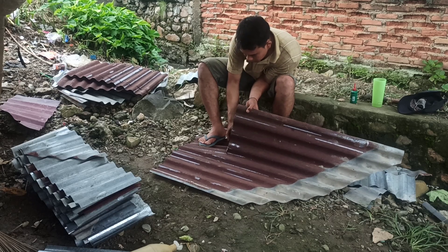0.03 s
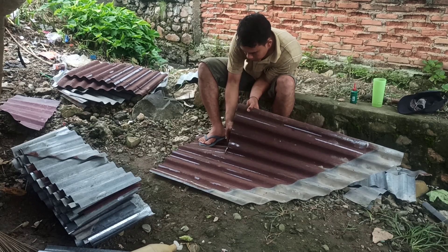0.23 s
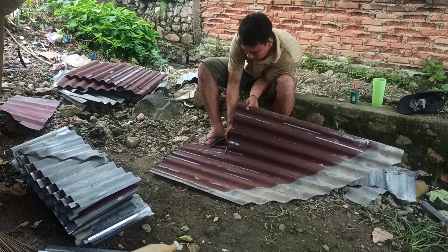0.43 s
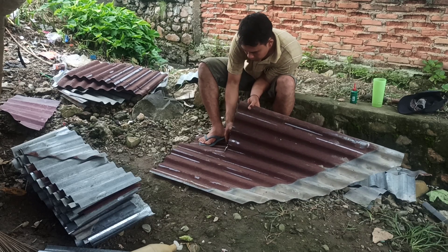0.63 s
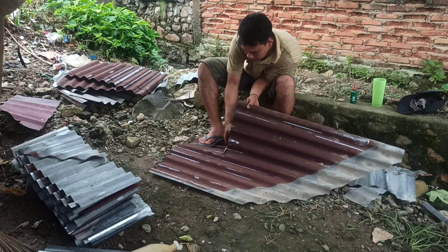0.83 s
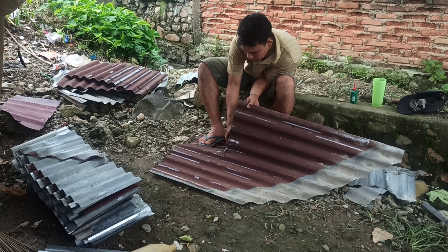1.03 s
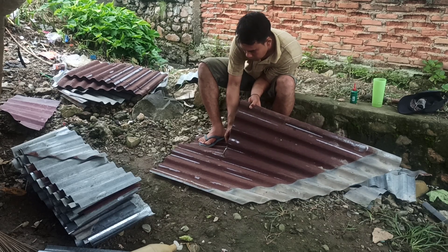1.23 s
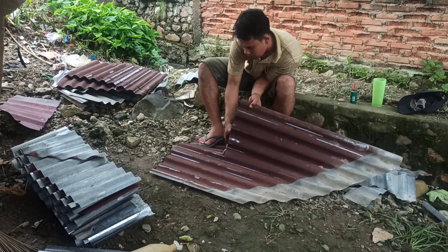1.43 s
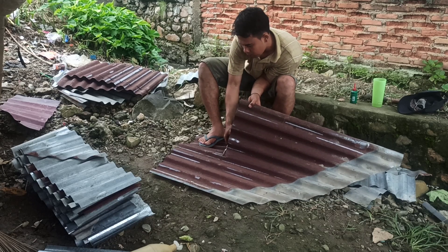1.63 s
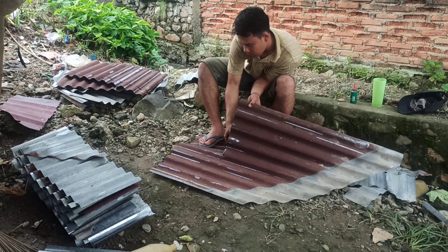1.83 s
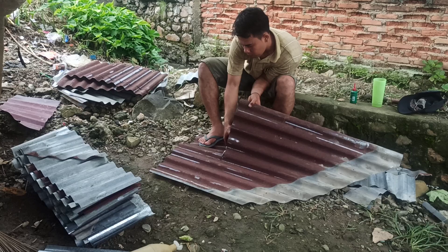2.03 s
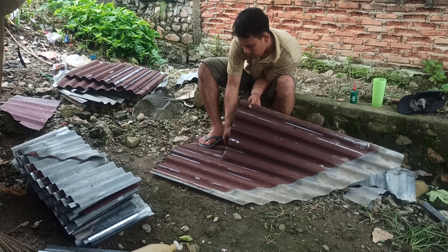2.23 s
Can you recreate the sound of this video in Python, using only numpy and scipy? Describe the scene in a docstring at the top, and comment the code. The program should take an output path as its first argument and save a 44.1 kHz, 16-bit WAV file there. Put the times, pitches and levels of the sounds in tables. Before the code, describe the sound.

Snipping through a thin corrugated metal sheet, with uneven tearing rasps, rattling knocks and brief squeals

```python
"""Tearing, clattering metal with sharp knocks, groans and short squeals, over quiet outdoor air.
Hand shears bite through a corrugated roofing sheet in a yard: each stroke is a run of slips and grit
that drives the sheet's dense and clear modes; buckling knocks drive the same modes as impulses.
Groans of the bent sheet and squeals of the blades are narrow noise resonances with gliding pitch.
Shaped noise makes the air, and a narrow resonance its thin high whine."""
import sys
import numpy as np
from scipy import signal
from scipy.fft import rfft, irfft
from scipy.io import wavfile

SR = 44100
rng = np.random.default_rng(int(sys.argv[2]) if len(sys.argv) > 2 else 0)


def inscribe(sig):
    """Save sig as 16-bit PCM at rate SR to the path in sys.argv[1].

    A 1-D sig is mono; a 2-D sig holds one channel per row.
    Samples are clipped to [-1, 1] before scaling.
    """
    pcm = np.round(np.clip(np.atleast_2d(sig).T, -1, 1) * 32767)
    wavfile.write(sys.argv[1], SR, pcm.astype(np.int16))


N = 101297

# stereo likeness over frequency: (frequency [Hz], left-right correlation [-1..1])
LIKENESS = [(100, .98), (250, 0.99), (500, 0.74), (1000, 0.28), (2500, 0.11), (5000, .05), (14000, 0.046)]


def amp(db):
    """Decibels to gain."""
    return 10 ** (np.asarray(db) / 20)


def evened(x):
    """Scales to rms 1."""
    return x / np.sqrt(np.mean(x ** 2) + 1e-20)


def read(points, hz):
    """Interpolates a table on a log-frequency axis."""
    f, value = np.transpose(points)
    return np.interp(np.log(hz + 1), np.log(f + 1), value)


def add(mix, start_s, sound):
    """Mixes a sound in at start_s, cut at the end of the mix."""
    part = mix[..., max(round(start_s * SR), 0):][..., :sound.shape[-1]]
    part += sound[..., :part.shape[-1]]


def colour(points, size=2048):
    """Causal minimum-phase impulse response with the given spectrum, via the Hilbert transform."""
    hz = abs(np.fft.fftfreq(size, 1 / SR))
    log_gain = np.log(amp(read(points, hz)))
    spectrum = np.exp(np.conj(signal.hilbert(log_gain)))
    return np.fft.ifft(spectrum).real[:size // 2]


def band_colour(band_db):
    """Impulse response from four band levels: bass, body, rasp and treble."""
    # band centres: (frequency [Hz])
    band_hz = [200, 580, 2500, 7000]
    return colour(list(zip(band_hz, band_db)))


def stereo(pair):
    """Mixes two unrelated signals as mid and side: alike in the bass, wide in the treble."""
    # channel balance: (frequency [Hz], left minus right [dB])
    balance = [(200, 0.3), (400, 3), (650, -1.2), (1200, 1), (2400, 0), (4400, 0.2), (7500, 2.5),
               (13000, -1.5)]
    a, b = rfft(pair)
    hz = np.fft.rfftfreq(pair.shape[1], 1 / SR)
    same = read(LIKENESS, hz)
    lean_db = read(balance, hz) / 2
    mid = a * np.sqrt((1 + same) / 2)
    side = b * np.sqrt((1 - same) / 2)
    return irfft([(mid + side) * amp(lean_db), (mid - side) * amp(-lean_db)], pair.shape[1])


def slips(length_s, rise_s, band_db):
    """One stroke: uneven slips and fine grit as the blades tear through the metal."""
    slips_per_s, slip_spread_db = 420, 4
    grit_db = -3  # relative to the slips
    release_s = 0.0047  # time constant
    t = np.arange(SR // 8) / SR
    chance = rng.random(len(t))
    size = rng.standard_normal(len(t))
    grit = rng.standard_normal(len(t))
    slip_gain = amp(slip_spread_db * np.clip(size, -2, 2))
    clicks = (chance < slips_per_s / SR) * slip_gain * np.sign(grit)
    force = np.minimum(t / rise_s, 1) * np.exp(-np.maximum(t - length_s, 0) / release_s)
    run = force * (evened(clicks) + amp(grit_db) * grit)
    run *= np.sqrt(length_s * SR) / np.linalg.norm(run)  # energy grows with length
    return signal.fftconvolve(run, band_colour(band_db))


def dense_ring():
    """Response of one spot on the sheet: a tick, a quick clatter and a wash of dense modes."""
    # decay of the dense modes: (frequency [Hz], t60 [s])
    decay = [(120, 0.19), (350, 0.71), (840, 0.42), (2200, 0.27), (6000, 0.24), (14000, 0.23)]
    # spectrum of the dense modes: (frequency [Hz], relative level [dB])
    sheet_spectrum = [(30, -39), (60, -26), (95, -31), (150, -7), (310, -7.5), (430, -0.5), (680, -1.5),
                      (1100, -9.5), (2400, -12.5), (4400, -17), (5400, -24), (7000, -15), (8300, -25.5),
                      (12000, -31), (16000, -31.5)]
    ring_db = -23
    tick_db, clatter_db, clatter_s = -14, -2.5, 0.0025  # levels relative to the wash; time constant
    noise = rng.choice([-1., 1.], (2, SR // 2))
    hz, t, z = signal.stft(noise, SR, nperseg=256)
    wash = amp(-60 * t / read(decay, hz)[:, None])
    clatter = np.exp(-t / clatter_s)
    wash_power = wash ** 2 / (wash ** 2).sum(1, keepdims=True)
    clatter_power = amp(clatter_db) ** 2 * clatter ** 2 / (clatter ** 2).sum()
    ring = signal.istft(z * np.sqrt(wash_power + clatter_power), SR, nperseg=256)[1]
    ring = stereo(ring / np.linalg.norm(ring[0]))
    ring[:, 0] += amp(tick_db)
    ring = signal.fftconvolve(ring, colour(sheet_spectrum)[None], axes=1)
    return amp(ring_db) * ring / np.sqrt((ring ** 2).sum() / 2)


def mode_ring():
    """The sheet's clear modes: decaying sines, each starting a little later in one channel."""
    # ringing modes: (frequency [Hz])
    mode_hz = [162, 196, 257, 424, 490, 587, 626, 672, 808, 985, 1135, 1348, 1715, 1873]
    # their levels: (level [dB])
    mode_db = [-42.5, -47, -39, -34.5, -37.5, -54, -43.5, -38, -38.5, -42.5, -43.5, -44, -50.5, -57]
    t60_s = 0.38
    t = np.arange(SR * 3 // 4) / SR
    out = 0
    for hz, db in zip(mode_hz, mode_db):
        lag_rad = np.arccos(read(LIKENESS, hz)) * rng.permutation(2)[:, None]
        swing = np.sin(np.maximum(2 * np.pi * hz * t - lag_rad, 0))
        ring = rng.choice([-1, 1]) * amp(-60 * t / t60_s) * swing
        highpass = signal.butter(2, hz / 2, "high", fs=SR, output="sos")
        ring = signal.sosfilt(highpass, ring)
        out = out + amp(db) * ring / np.linalg.norm(ring[0])
    return out


def sheet(count=14):
    """Strokes and buckling knocks drive the sheet's modes at changing spots along the cut."""
    # strokes of the shears and shifts of the sheet: (start [s], length [s], rise [s],
    # bass [dB], body [dB], rasp [dB], treble [dB])
    strokes = [ (0.000, 0.017, .002, 0, 5, -7, -6.5), (0.038, 0.028, .008, -3.5, 6, -11.5, -13),
               (0.090, 0.019, .006, 4.5, -5.5, -1.5, 0.5), (0.175, 0.047, .025, 2.5, 2, -12.5, -14),
               (0.261, 0.02, .005, -25, -12, -14, -7), (0.304, 0.026, 0.0054, -15, -10.5, -17.5, -13),
               (0.401, 0.026, .002, 7.5, -3, 3.5, -9), (0.441, 0.025, .010, -14, 6.5, 1, 8.5),
               (0.458, 0.032, .002, 2.5, 5.5, 3.5, -5), (0.615, 0.06, .040, -11.5, -2, -6.5, -5),
               (0.660, 0.033, .010, -5.5, -1, 6.5, 6.5), (0.745, 0.077, .020, 1.5, -16.5, -20, -20.5),
               (0.859, 0.019, .005, -1, -11, -11.5, -15.5), (0.915, 0.033, .010, -28, -23, -45, -25),
               (0.999, 0.018, .008, -18.5, -6, -11, -7.5), (1.084, .014, .002, -22, -11, 0, 7.5),
               (1.097, .080, .003, -2.5, 7.5, 0, 5.5), (1.172, 0.035, .006, 9, 2, -9, -5),
               (1.329, 0.027, 0.01, 3.5, 3, -3.5, -6), (1.353, 0.071, .004, 0, 0, -2, -2),
               (1.488, 0.022, .010, -12.5, -8, -13.5, -17.5), (1.564, 0.018, .003, -17, -41, -32, -7),
               (1.608, .052, .016, 0, -14.5, -12, 0), (1.657, 0.027, .004, -3, -1.5, 5.5, -1.5),
               (1.680, 0.066, .003, -2.5, -1, 0, 5), (1.703, 0.052, 0.0026, 7, 5, 7.5, -33),
               (1.862, 0.044, 0.0099, 3, -3.5, -4, 0.5), (1.906, 0.031, .008, 3, 3.5, -1.5, 3.5),
               (1.947, 0.05, .004, 7, -2, -0.5, 10), (2.028, 0.071, .004, 8.5, 0, -9, -15),
               (2.053, 0.055, .003, 4.5, -13, 2, 12), (2.213, 0.0081, .003, -10, 1.5, -6.5, -2.5)]
    # sheet buckles and snaps back: (time [s], bass [dB], body [dB], rasp [dB], treble [dB])
    knocks = [(0.200, -3, -9, -17, -24), (0.232, 2, -22, -20, -22), (0.402, 7, -2.5, -6.5, -9),
              (0.458, 1, 12.5, 7.5, -2), (1.085, -23, -17, -4.5, 1.5), (1.098, 3, -1, -25, -13),
              (1.180, 0, 3.5, 5, -15.5), (1.627, -37, -2, -3.5, -10), (1.681, 0, -5.5, -7, 2.5),
              (1.706, -1, -2, 10, -4), (2.216, -14, -10, -26, -15), (2.2655, -6.5, 9, 6.5, 0.5),
              (2.292, 10, 10.5, 11.5, 5)]
    knock_s = 0.018  # a knock carries the energy of a stroke this long
    drive = np.zeros((count, N))
    for k, (start_s, length_s, rise_s, *band_db) in enumerate(strokes):
        add(drive[k % count], start_s, slips(length_s, rise_s, band_db))
    for k, (start_s, *band_db) in enumerate(knocks):
        add(drive[k % count], start_s, np.sqrt(knock_s * SR) * band_colour(band_db))
    dense = sum(signal.fftconvolve(spot[None], dense_ring(), axes=1)[:, :N] for spot in drive)
    clear = signal.fftconvolve(drive.sum(0)[None], mode_ring(), axes=1)[:, :N]
    return dense + clear


def fuzzy_tone(hz, pole_width_hz):
    """Two-channel noise in a narrow double-pole resonance that follows the curve hz."""
    r = np.exp(-np.pi * pole_width_hz / SR)
    z = rng.standard_normal((2, len(hz))) + 1j * rng.standard_normal((2, len(hz)))
    slow = signal.lfilter([1], [1, -2 * r, r * r], z)
    carrier = np.exp(2j * np.pi * np.cumsum(hz) / SR)
    return evened((slow * carrier).real)


def yard():
    """Quiet outdoor air as shaped noise, with a thin high whine, perhaps insects."""
    # spectrum of the air: (frequency [Hz], relative level [dB])
    air_spectrum = [(20, -18), (50, -23), (95, 5.5), (200, 6), (500, 1.5), (1200, -23.5), (3000, -20),
                    (5500, -32.5), (8000, -32.5), (15000, -44)]
    air_db = -40.5
    whine_hz, whine_pole_width_hz, whine_db = 7680, 190, -58
    gain = amp(read(air_spectrum, np.fft.rfftfreq(N, 1 / SR)))
    air = irfft(rfft(rng.standard_normal((2, N))) * gain, N)
    whine = fuzzy_tone(np.full(N, whine_hz), whine_pole_width_hz)
    return amp(air_db) * evened(stereo(air)) + amp(whine_db) * whine


def rubbed_tone(length_s, hz, glide, pole_width_hz, release_s):
    """A rough stick-slip tone that swells, settles in pitch and rings out."""
    glide_s = 0.016  # time constant
    t = np.arange(SR // 4) / SR
    level = np.minimum(2 * t / length_s, 1) * np.exp(-np.maximum(t - length_s, 0) / release_s)
    pitch_hz = hz * (1 + glide * np.exp(-t / glide_s))
    tone = level * fuzzy_tone(pitch_hz, pole_width_hz)
    return tone * np.linalg.norm(level) / np.linalg.norm(tone, axis=1, keepdims=True)


def bending():
    """Low stick-slip groans as the cut edge is bent aside, alike in both channels."""
    # groans: (start [s], length [s], final pitch [Hz], level [dB], initial pitch offset [share])
    groans = [(0.401, 0.022, 160, -28.5, -0.0069), (0.455, .014, 600, -15.5, -0.0073),
              (1.100, 0.097, 256.2, -32, -0.0047), (1.880, 0.018, 418, -22.5, 0.075),
              (1.945, 0.059, 199.4, -27, -0.15), (2.029, 0.074, 259, -30, -0.014),
              (2.055, 0.033, 169.2, -26, 0.1)]
    pole_width_hz, release_s = 23, 0.025
    out = np.zeros(N)
    for start_s, length_s, hz, db, glide in groans:
        groan = rubbed_tone(length_s, hz, glide, pole_width_hz, release_s)[0]
        add(out, start_s, amp(db) * groan)
    return out


def blades():
    """Stick-slip squeals where the blades rub on the cut edge."""
    # squeals: (start [s], length [s], final pitch [Hz], level [dB], initial pitch offset [share],
    # left minus right [dB])
    squeals = [(0.652, 0.043, 2400, -25.5, .2, -3.5), (0.640, 0.021, 3020, -33, 0.086, 2),
               (0.657, 0.027, 7240, -28, 0, 1), (1.950, 0.016, 6160, -28, 0.055, 7),
               (1.942, 0.042, 8050, -30.5, 0, -5), (1.949, 0.021, 7960, -31, 0.098, -7),
               (2.055, 0.03, 3965, -27, 0, -1.5), (2.047, 0.055, 4310, -32, 0.079, -6)]
    pole_width_hz, release_s = 110, 0.03
    out = np.zeros((2, N))
    for start_s, length_s, hz, db, glide, pan_db in squeals:
        gain = amp(db + pan_db * np.array([[.5], [-.5]]))
        add(out, start_s, gain * rubbed_tone(length_s, hz, glide, pole_width_hz, release_s))
    return out


def scene():
    """Sheet, groans, blades and yard together."""
    return sheet() + bending() + blades() + yard()


def record(dry):
    """Linear-phase filter: the treble has an empty band and ends at a steep edge."""
    gap_hz, edge_hz = (8700, 11550), 15700
    taps = signal.firwin(255, [*gap_hz, edge_hz], window=("kaiser", 6), fs=SR)
    return signal.oaconvolve(dry, taps[None], "same")


dry = scene()
out = record(dry)
inscribe(out)
```